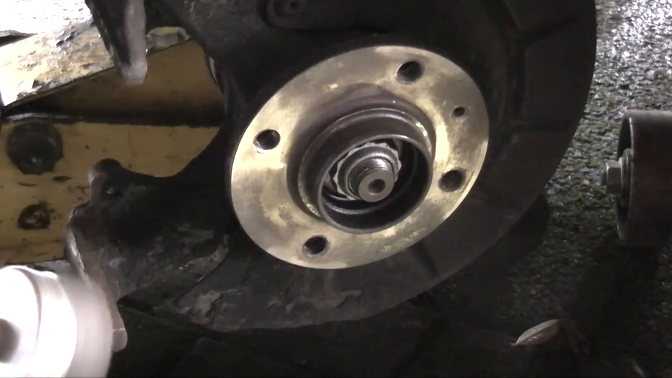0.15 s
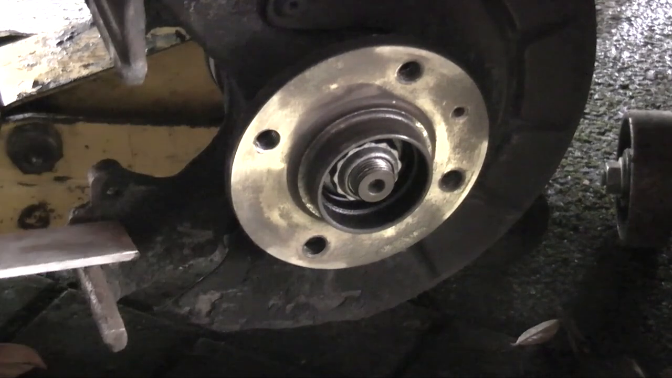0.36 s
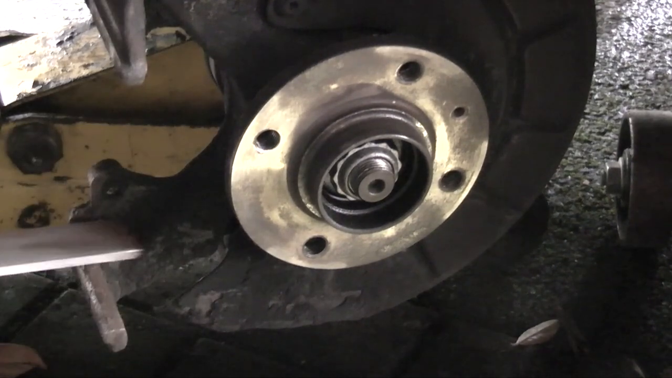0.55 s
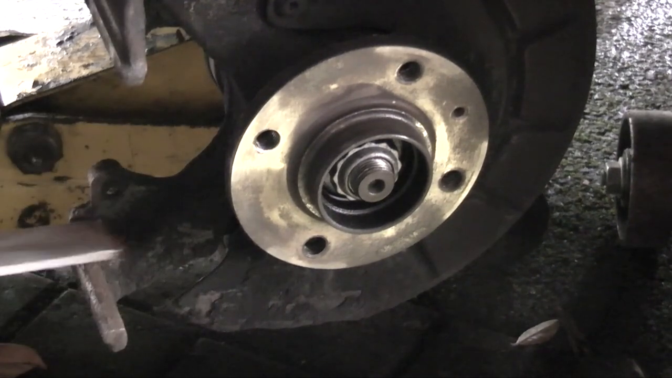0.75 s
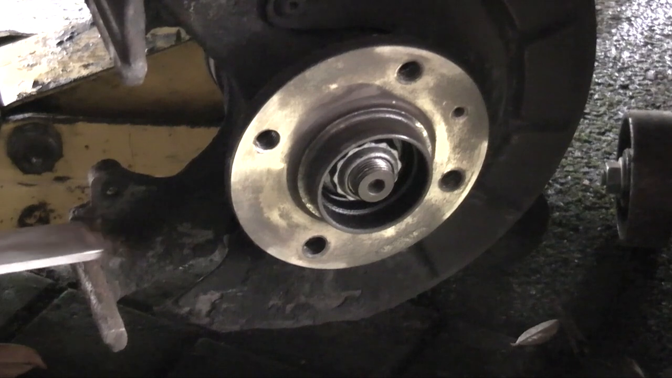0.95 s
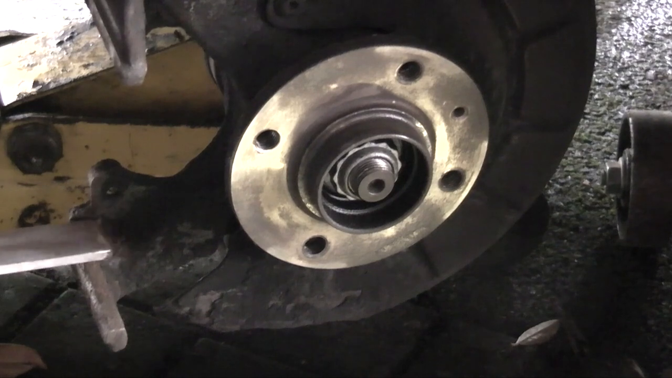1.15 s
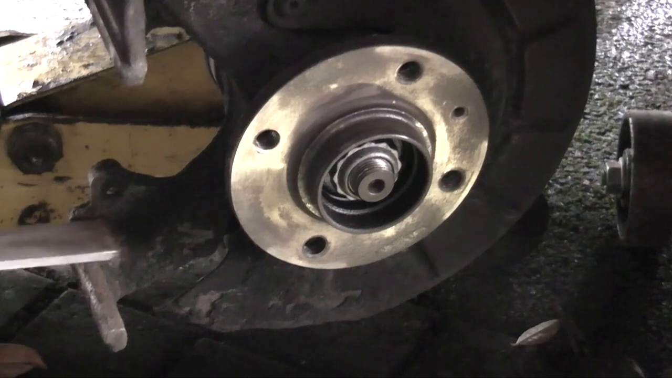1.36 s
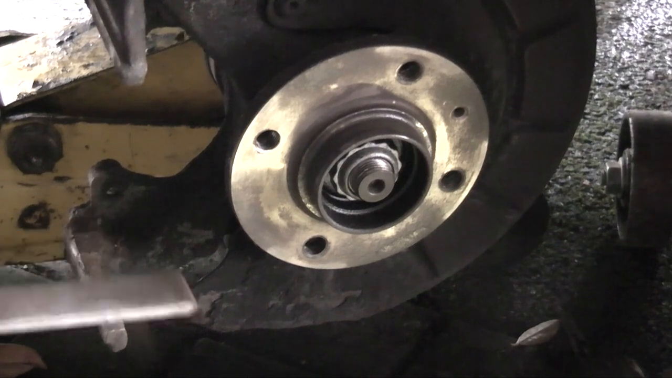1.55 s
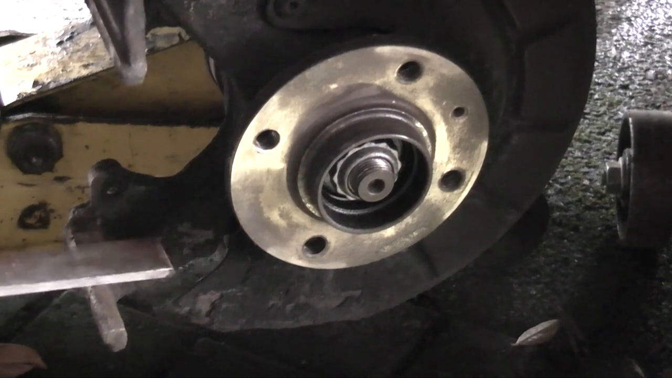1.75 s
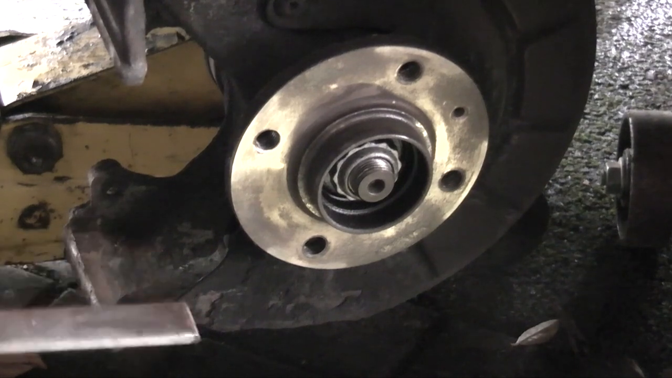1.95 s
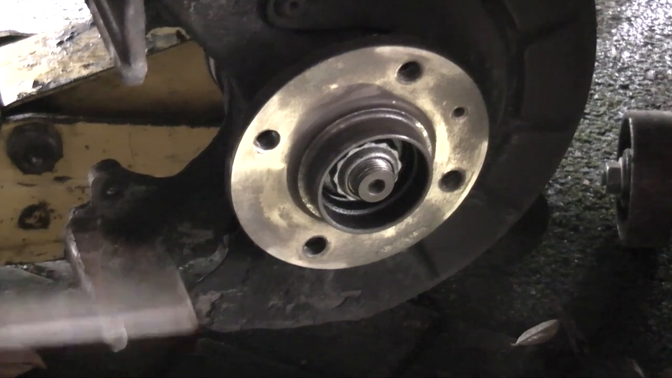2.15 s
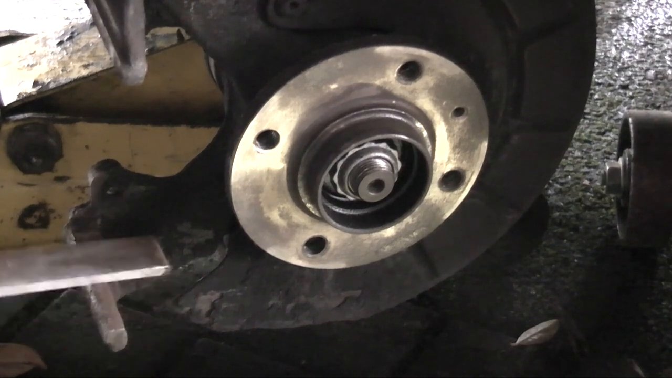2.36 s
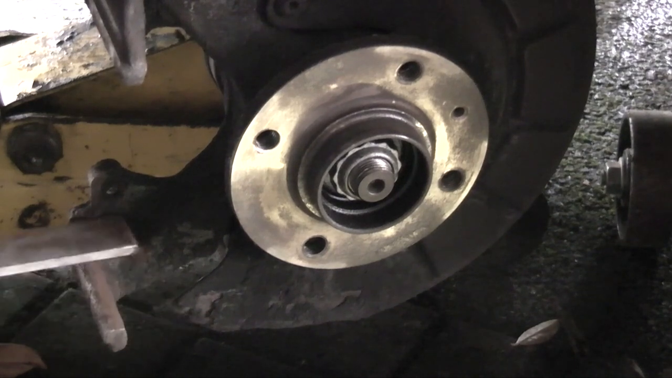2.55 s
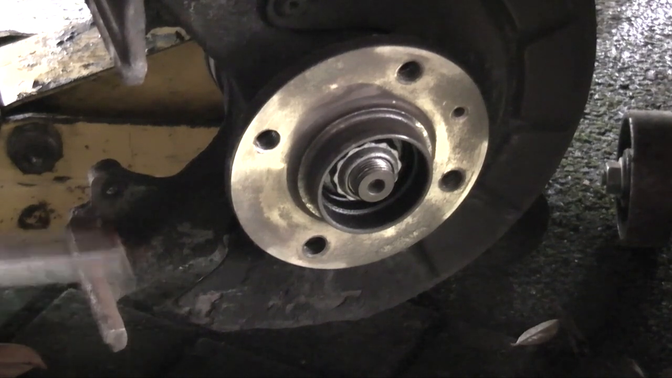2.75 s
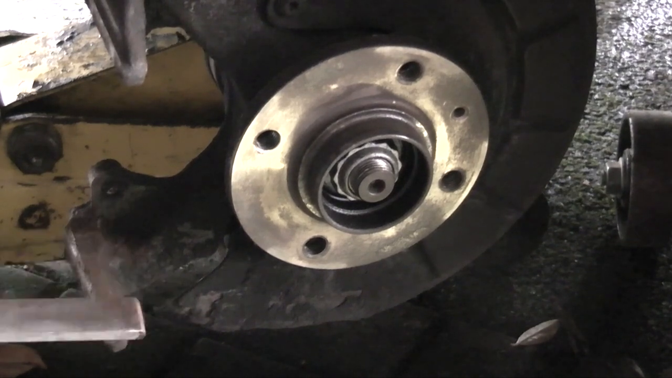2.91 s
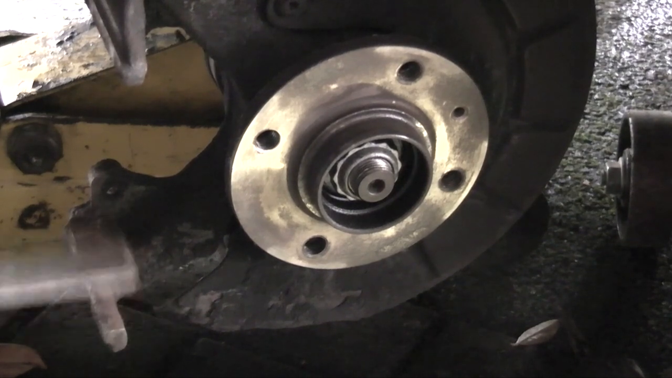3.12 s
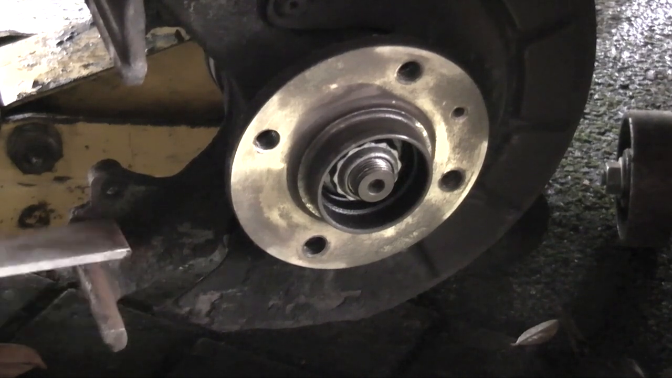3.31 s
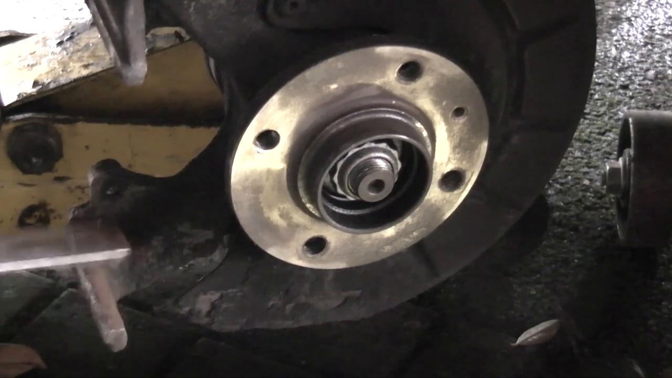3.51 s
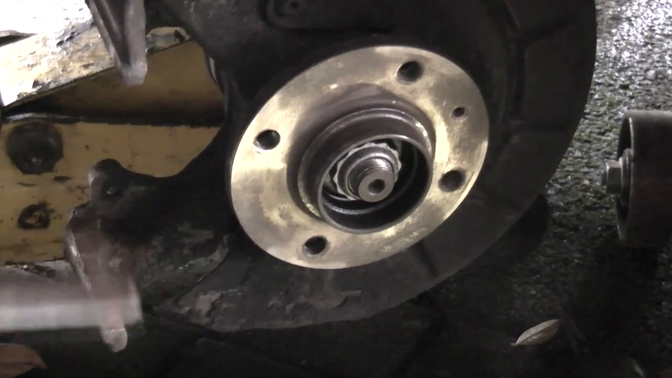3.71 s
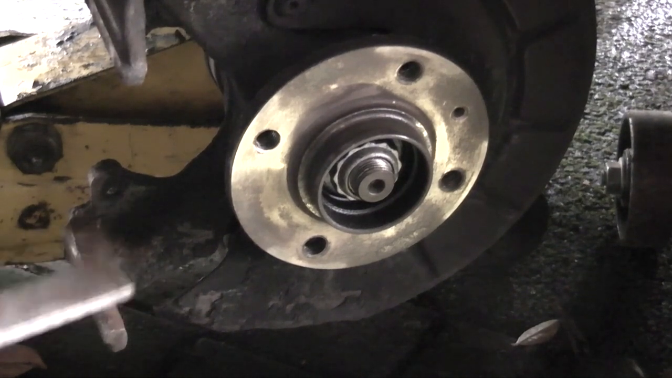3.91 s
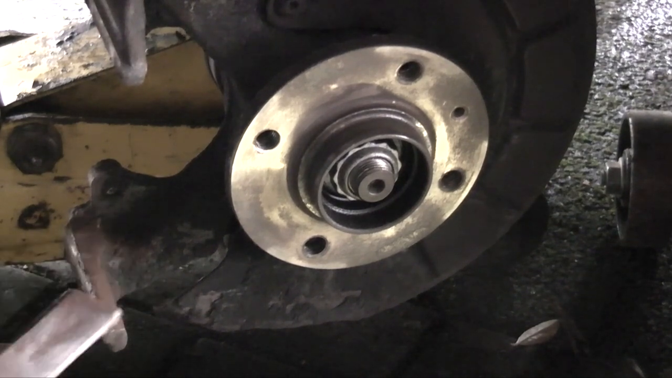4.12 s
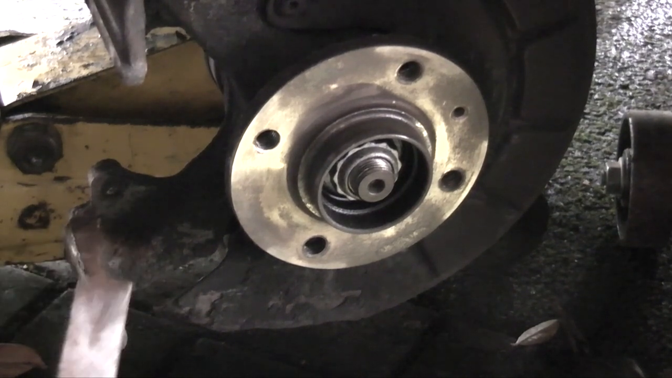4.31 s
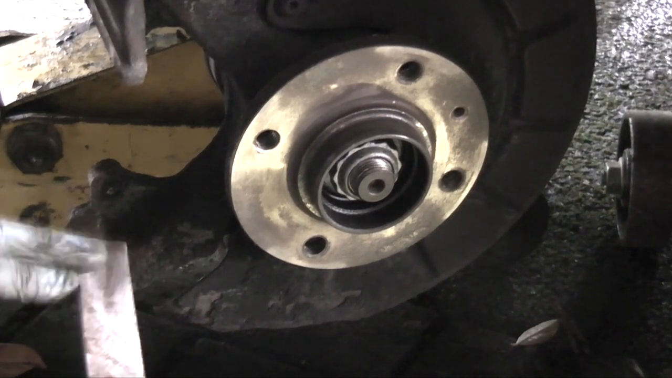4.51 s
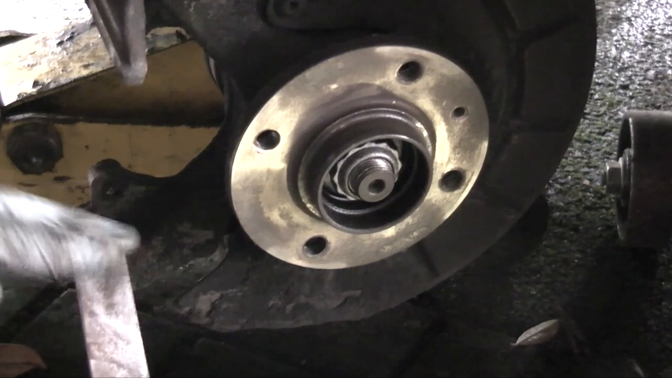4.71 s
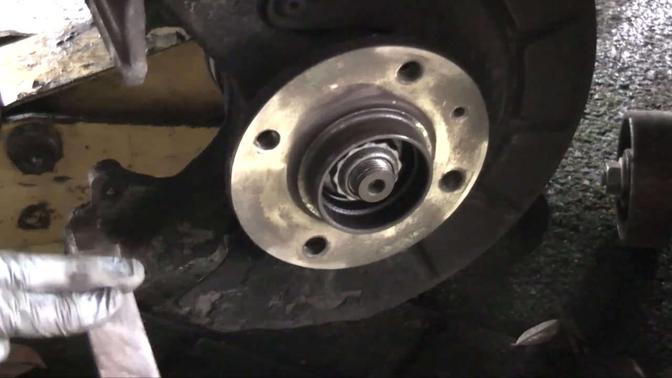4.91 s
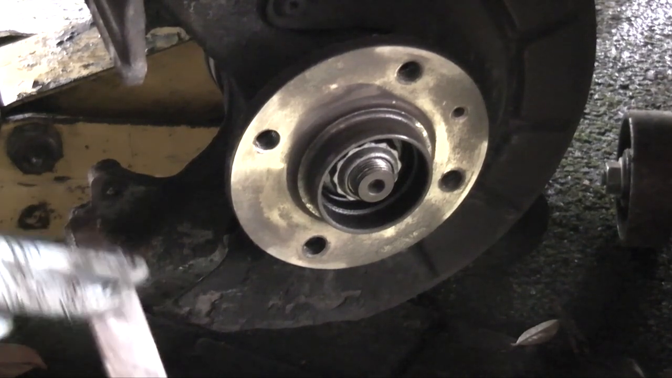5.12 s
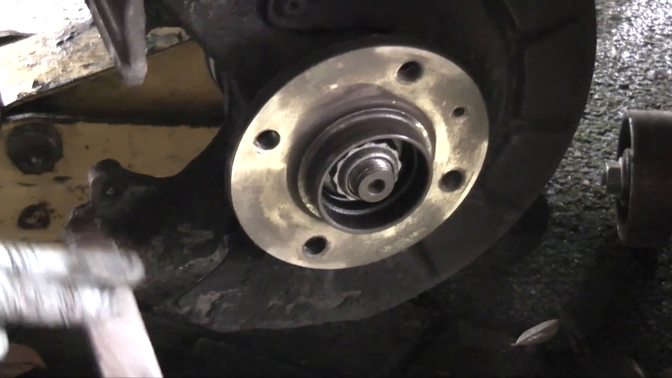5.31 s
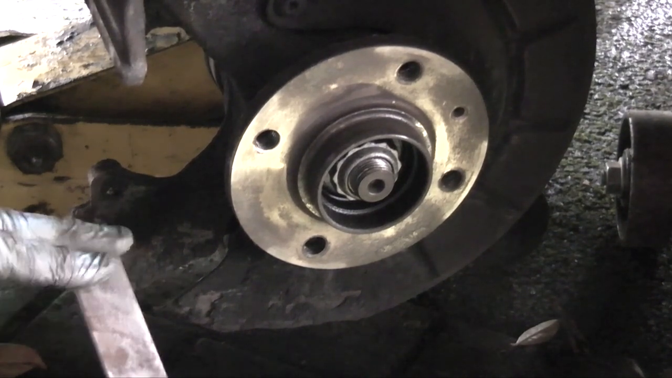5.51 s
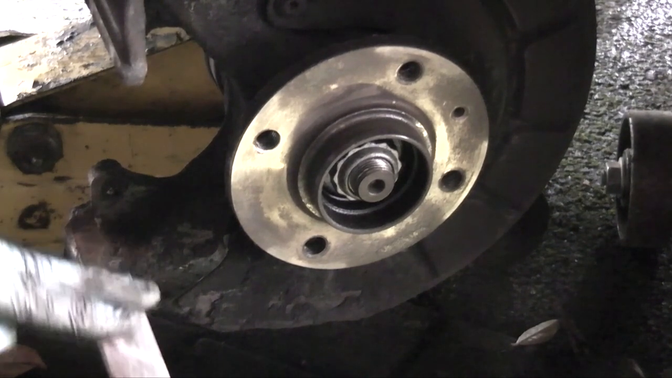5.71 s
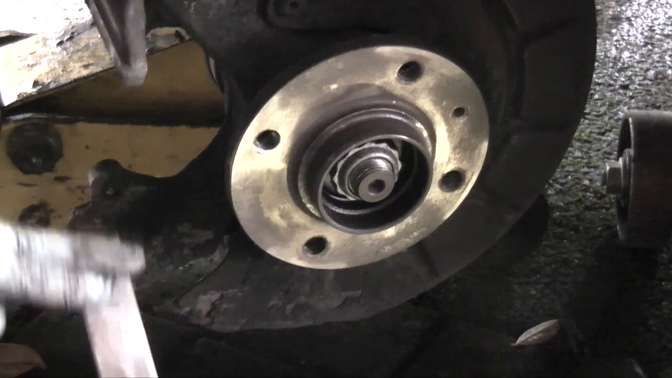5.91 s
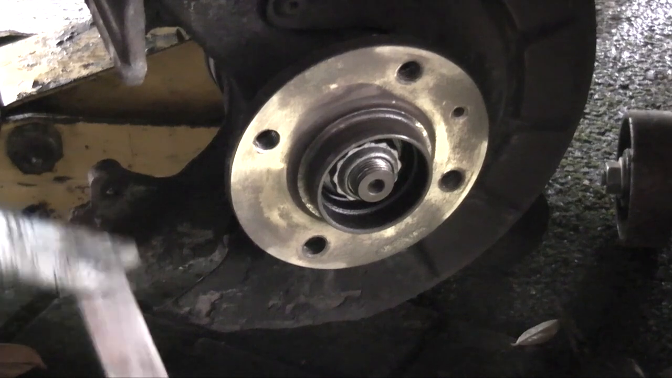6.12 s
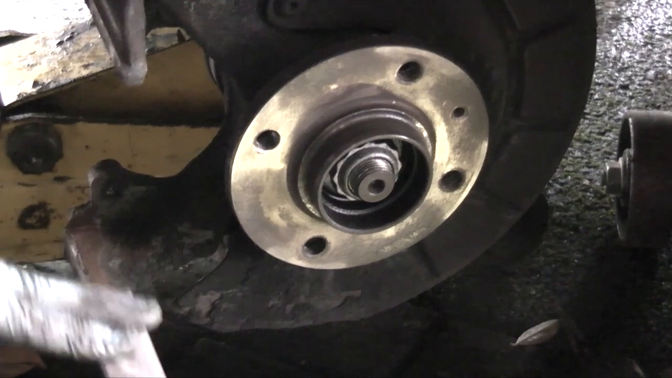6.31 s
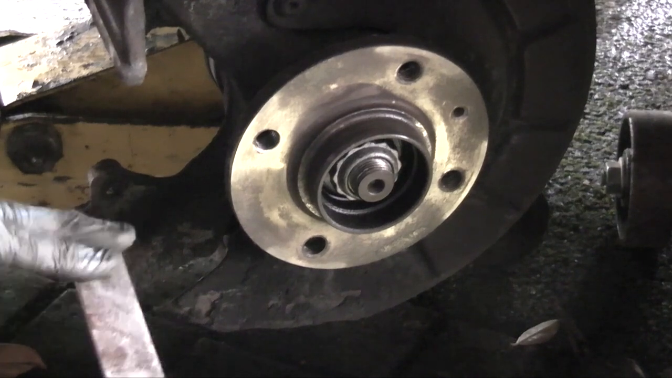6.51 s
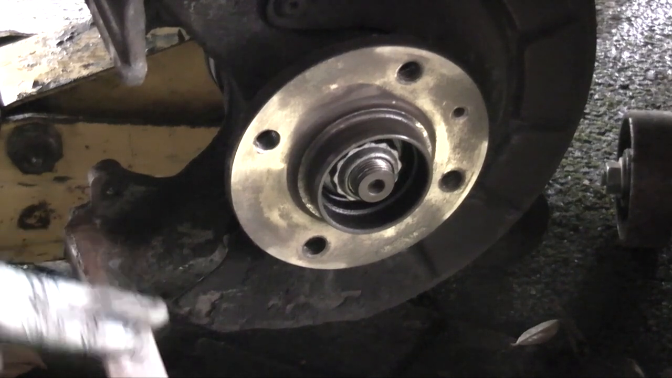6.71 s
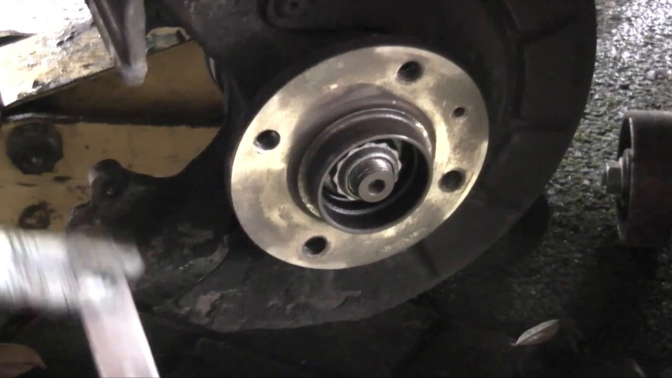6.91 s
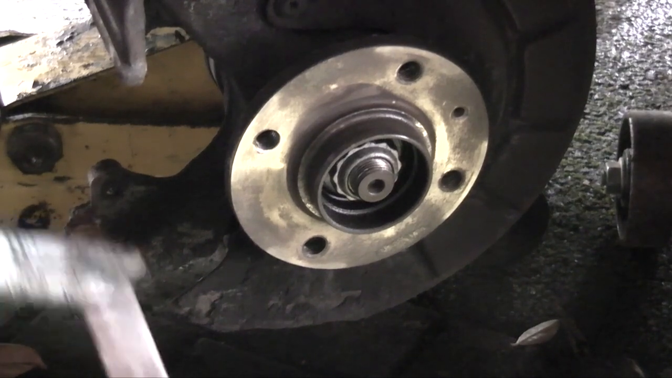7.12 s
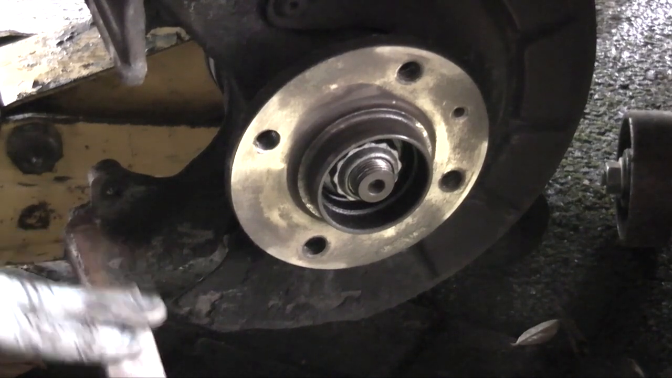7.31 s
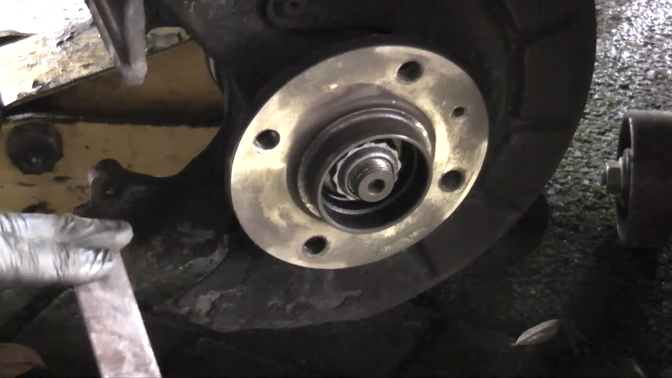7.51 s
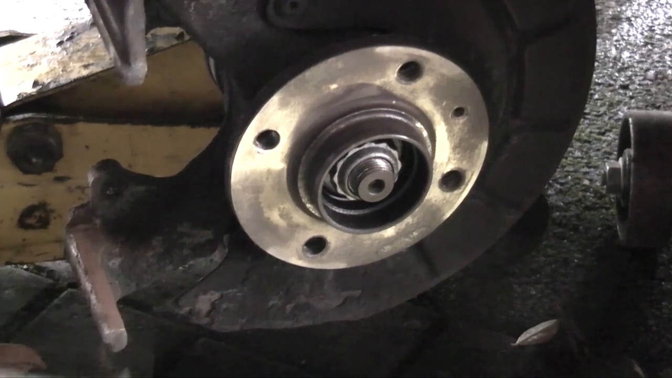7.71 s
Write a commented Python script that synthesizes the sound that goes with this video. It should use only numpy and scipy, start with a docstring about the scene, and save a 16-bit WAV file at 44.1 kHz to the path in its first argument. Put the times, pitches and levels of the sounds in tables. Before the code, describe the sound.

A brief spray-can hiss cuts off, then a hand file scrapes steel in quick back-and-forth strokes, with metallic knocks and a short slow drag midway.

```python
"""Filing rust off steel.

After a short hiss like a spray can there is a cut, and a filing scene fades in: a hand file scrapes a steel
brake carrier in quick strokes, close by in a garage. Grain noise, shaped by the speed of each stroke, drives
modes of the steel, file and hub. The file is held three ways and dragged slowly around the last change;
snags crack, and many pushes end in a bump: a pulse and a noisy rattle through a resonant shield.
Echoes and faint room noise surround it."""
import sys
import numpy as np
from scipy import signal
from scipy.fft import rfft, irfft
from scipy.io import wavfile
from scipy.ndimage import uniform_filter1d

SR = 44100
rng = np.random.default_rng(int(sys.argv[2]) if len(sys.argv) > 2 else 0)


def store_pcm(level_fs):
    """Save levels as 16-bit WAV."""
    pcm = np.round(np.clip(level_fs, -1, 1) * 32767).astype(np.int16)
    wavfile.write(sys.argv[1], SR, np.atleast_2d(pcm).T)


N = 342216
TIME = np.arange(N) / SR
HZ = np.fft.rfftfreq(16384, 1 / SR)
# a cut: the hiss ends and the filing scene fades in
CUT_S = 0.272

# Strokes, push and pull in turn. Each row: start in seconds, length in seconds, relative level in dB,
# share of the stroke at which it is fastest [0-1].
STROKES = [(0.326, 0.13, -15.5, 0.5), (0.425, 0.14, -17, 0.65), (0.57, 0.12, -13, 0.34),
           (0.66, 0.14, -16, 0.55), (0.797, 0.13, -13, 0.41), (0.89, 0.13, -14.5, 0.58),
           (0.999, 0.13, -16, 0.54), (1.1, 0.129, -24.5, 0.61), (1.243, 0.14, -17, 0.39),
           (1.348, 0.12, -18.5, 0.48), (1.456, 0.19, -12.0, 0.53), (1.6, 0.13, -15, 0.38),
           (1.748, 0.16, -11.5, 0.31), (1.912, 0.13, -11, 0.29), (2.039, 0.13, -11, 0.3),
           (2.172, 0.15, -10.5, 0.38), (2.298, 0.154, -11.5, 0.24), (2.437, 0.13, -12.0, 0.41),
           (2.546, 0.12, -10, 0.35), (2.645, 0.15, -12.5, 0.5), (2.783, 0.18, -10.5, 0.27),
           (2.909, 0.12, -9, 0.28), (3.025, 0.21, -11, 0.24), (3.162, 0.12, -13, 0.31),
           (3.279, 0.13, -9.5, 0.27), (3.402, 0.11, -8.5, 0.19), (3.503, 0.15, -10.5, 0.46),
           (3.648, 0.12, -8.5, 0.33), (3.772, 0.15, -12, 0.23), (4.914, 0.19, -26.5, 0.6),
           (5.095, 0.21, -15.5, 0.66), (5.319, 0.15, -14.0, 0.49), (5.467, 0.15, -15, 0.52),
           (5.648, 0.16, -14.0, 0.28), (5.783, 0.17, -12, 0.47), (5.953, 0.17, -12.0, 0.34),
           (6.08, 0.2, -12, 0.53), (6.301, 0.15, -11.0, 0.3), (6.422, 0.21, -12.0, 0.5),
           (6.638, 0.16, -11, 0.3), (6.753, 0.23, -11.5, 0.48), (6.951, 0.24, -12.0, 0.27),
           (7.084, 0.18, -11.0, 0.58), (7.245, 0.2, -13.0, 0.53), (7.41, 0.21, -12.5, 0.53),
           (7.619, 0.2, -12, 0.36)]
# Times in seconds at which the grip changes: on the edge, then flat, then steep with two hands.
GRIP_CHANGES_S = [1.47, 4.14]
# The file bumps at the end of a push. Each row: time in seconds, relative blow and rattle levels in dB.
BUMPS = [(.366, -61, -30), (1.068, -39, -31), (1.792, -35, -12), (2.092, -17, -13), (2.349, -70, -13),
         (2.615, -10.5, -12.5), (2.854, -11, -16.5), (3.09, -50, -16.5), (3.35, -12, -17),
         (3.592, -15, -21), (3.835, -21, -22), (5.254, -0.5, -20.5), (5.891, -3, -16), (6.221, -0.5, -15),
         (6.552, -11, -13), (6.891, -13, -11.5), (7.223, -17, -8.5), (7.558, 0, -10.5)]
# A tooth catches or the file touches down. Each row: time in seconds, relative level in dB.
SNAGS = [(1.256, -12.5), (1.815, -3.5), (2.463, -6), (3.413, -24), (4.148, -22), (4.589, -21.5),
         (4.704, -34), (4.758, -34.5), (4.962, -18), (5.659, -16), (6.126, -9.5), (6.551, -9), (6.888, -5),
         (7.221, -4.5)]


def amp(db):
    """Decibels to gain."""
    return 10 ** (np.asarray(db) / 20)


def evened(x):
    """Scales to rms 1."""
    return x / np.sqrt(np.mean(x ** 2) + 1e-20)


def read(points, hz):
    """Joins (Hz, value) points on a log-frequency axis."""
    f, value = np.transpose(points)
    return np.interp(np.log(hz + 1), np.log(f + 1), value)


def add(mix, start_s, sound):
    """Adds a sound to the mix at a time in seconds."""
    part = mix[max(round(start_s * SR), 0):][:len(sound)]
    part += sound[:len(part)]


def tilted(x, db_per_octave, pivot_hz=2900):
    """Brightens or dulls a sound about a pivot, between 700 and 9000 Hz."""
    hz = np.clip(np.fft.rfftfreq(len(x), 1 / SR), 700, 9000)
    return irfft(rfft(x) * amp(db_per_octave * np.log2(hz / pivot_hz)), len(x))


def split(x, hz):
    """The dull and the bright part of a sound."""
    dull = signal.sosfiltfilt(signal.butter(1, hz, fs=SR, output="sos"), x)
    return dull, x - dull


def body(colour, modes):
    """Causal impulse response of energy 1: resonances (Hz, width Hz, dB) standing on a broad colour."""
    peaks = sum(amp(db) ** 2 / (1 + (2 * (HZ - hz) / width_hz) ** 2) for hz, width_hz, db in modes)
    log_gain = np.log(amp(read(colour, HZ)) * np.sqrt(1 + peaks))
    circle = np.concatenate([log_gain, log_gain[-2:0:-1]])
    # minimum phase, from the Hilbert transform of the log gain
    spectrum = np.exp(np.conj(signal.hilbert(circle)))
    ring = np.fft.ifft(spectrum).real[:len(HZ)]
    return ring / np.linalg.norm(ring)


def hiss(colour):
    """Steady noise of a given colour, rms 1."""
    gain = amp(read(colour, np.fft.rfftfreq(N, 1 / SR)))
    return evened(irfft(rfft(rng.standard_normal(N)) * gain, N))


def room_noise(level_db=-44):
    """Steady coloured noise of the quiet garage."""
    # Each row: frequency in Hz, relative density in dB per Hz.
    colour = [(30, -58), (65, -17), (130, -5), (250, 3.5), (550, 3), (1100, 2.5), (2400, -4), (3800, -13),
              (7000, -18), (15000, -35)]
    return amp(level_db) * hiss(colour)


def spray(start_db=-25, sag_db_per_s=14, cut_s=0.0017):
    """A burst of coloured noise that sags and stops dead."""
    # Each row: frequency in Hz, relative density in dB per Hz.
    colour = [(59, -78), (100, -41), (248, -16.5), (281, -16.5), (487, -22), (564, -8), (640, -16.5),
              (825, -11), (1020, -15.5), (1430, -5), (1590, -12.5), (1960, -4.5), (3850, -10), (5280, -6),
              (15500, -32)]
    gate = np.clip((CUT_S - TIME) / cut_s, 0, 1)
    return amp(start_db - sag_db_per_s * TIME) * gate * hiss(colour)


def garage(x, near_db=-10, near_s=0.0094, tail_db=-11, echoes_per_s=4000):
    """Close reflections from the wheel arch, and a tail whose decay depends on frequency."""
    # Ring of hub and garage. Each row: frequency in Hz, time in seconds to fall 60 dB.
    ring_t60 = [(200, 0.75), (700, 0.33), (2000, 0.1), (5000, 0.17), (12000, 0.12)]
    t = TIME[:SR // 2]
    taps = rng.choice([-1., 1.], len(t)) * (rng.random(len(t)) < echoes_per_s / SR) * (t > .001)
    hz, frame_s, z = signal.stft(taps, SR, nperseg=256)
    fade = amp(-60 * frame_s / read(ring_t60, hz)[:, None])
    tail = signal.istft(z * fade, SR, nperseg=256)[1][:len(t)]
    near = taps * np.exp(-t / near_s)
    echoes = amp(near_db) * near / np.linalg.norm(near) + amp(tail_db) * tail / np.linalg.norm(tail)
    return x + signal.fftconvolve(x, echoes)[:N]


def microphones(mid, balance_db=0.18):
    """Two close capsules: their small difference arrives late, by an amount that changes with frequency."""
    # Each row: frequency in Hz, level of the difference in dB against the sum.
    width = [(60, -15), (300, -26), (700, -17.5), (2800, -15), (5000, -23.5), (12000, -47)]
    hz, knots_hz = np.fft.rfftfreq(N, 1 / SR), np.arange(0, SR / 2, 25)
    phase = np.interp(hz, knots_hz, -np.cumsum(rng.exponential(1, len(knots_hz))))
    side = irfft(rfft(mid) * amp(read(width, hz)) * np.exp(1j * phase), N)
    return np.array([(mid + side) * amp(-balance_db), (mid - side) * amp(balance_db)])


def hub(force):
    """A few lightly damped modes of the heavy hub sing on between the strokes."""
    # Each row: frequency in Hz, time in seconds to fall about 49 dB, relative drive in dB on edge, flat, steep.
    hub_modes = [(655, 0.77, 11.5, 15.5, 9.4), (1130, 0.44, 8, 20.3, 15.6), (1564, 0.23, -3, 9, 1.7),
                 (1651, 1, 8, 23.2, 18.2), (3930, 0.44, 13, 12, 10.7)]
    grip = np.searchsorted(GRIP_CHANGES_S, TIME)
    out = np.zeros(N)
    for hz, decay_s, *drive_db in hub_modes:
        b, a = signal.iirpeak(hz, hz * decay_s / 1.78, fs=SR)
        out += signal.lfilter(b, a, force * amp(drive_db)[grip])
    return out


def shield(knocks):
    """A bump shakes what is likely the sheet-steel shield: resonances on a broad thud."""
    # Each row: frequency in Hz, relative density in dB per Hz.
    thud = [(60, -53), (130, -12.5), (230, -16.5), (350, -2.5), (700, -10.5), (1400, -2), (2800, 5.5),
            (5000, -8), (10000, -51)]
    # Each row: frequency in Hz, width in Hz, level in dB above the thud colour.
    shield_modes = [(321, 35, 13.5), (343, 5.3, 11), (406, 7, 22.5), (430.5, 6.8, 19.5), (492, 52, 15),
                    (611.4, 4.7, 22.5), (655, 44, 18), (840, 196, 19.5), (1191, 17, 19.5), (1360, 14, 12),
                    (2330, 110, -17), (2700, 170, -8)]
    return signal.oaconvolve(knocks, body(thud, shield_modes))[:N]


def blade(force):
    """A file mode sounds while the contact is off its nodes, so colours come and go within a stroke."""
    # Bending modes. Each row: frequency in Hz, width in Hz, relative gain in dB, half waves along the stroke.
    file_modes = [(2463, 91, 10.5, 1.17), (3044, 27, 16, 1.43), (3490, 89, 12, 2.26), (3820, 45, 9.5, 0.97),
                  (4620, 41, 9, 3.1), (5170, 130, 7, 3.44), (7230, 58, 7, 3.24), (12300, 59, -19, 2.2)]
    starts_s = [row[0] for row in STROKES]
    ends = np.arange(len(STROKES)) % 2 + rng.normal(0, 0.26, len(STROKES))
    travel = np.interp(TIME, starts_s, ends)
    out = np.zeros(N)
    for hz, width_hz, db, half_waves in file_modes:
        b, a = signal.iirpeak(hz, hz / width_hz, fs=SR)
        out += amp(db) * signal.lfilter(b, a, force * np.cos(np.pi * half_waves * travel))
    return out


def steel(force):
    """Each grip damps and drives the modes of the steel differently."""
    # Broad contact colour. Each row: frequency in Hz, relative level in dB on edge, flat, steep.
    contact = np.array([(60.3, -67, -82, -86), (134, -41.5, -47, -31), (292, -30.5, -24.5, -26.5),
                        (476, -31.5, -25.5, -25), (1040, -32.5, -21.5, -28.5), (1484, -28.5, -18, -27.5),
                        (1730, -34, -11, -19.5), (3690, -17, -14.5, -12.5), (5040, -27, -12.5, -18.5),
                        (5860, -27, -23.5, -22), (6980, -34, -30.5, -19), (8820, -35, -28, -34.5),
                        (10060, -41.5, -35.5, -36.5), (14400, -57, -51.5, -51.5)])
    # Carrier and file modes. Each row: frequency in Hz, width in Hz, dB above the colour on edge, flat, steep.
    modes = np.array([(333.7, 13, 17, 14, 7.5), (695, 4.4, 2, 6, 10), (848, 82, 9.5, 15, 10.5),
                      (911, 29, 13, 17, 22), (1050, 4.8, 8, 21, 33), (1034, 8.2, 18, 25, -7.5),
                      (1146.8, 7.3, 6, 20, 30), (1220, 198, 12, 15, 13.5), (1515, 50, 15, 15, -2),
                      (1570, 30, 19, 16, 13.5), (1672, 8.4, 27.5, 2, 17.5), (1757, 77, 20, 5, 11.5),
                      (1814, 18, 26.5, 9, 13), (1947, 83, 21, 10, 14.5), (2218, 49, 15, 6.5, 10),
                      (2443, 41, -9, 8, -7), (2677, 26, 13, 11, 5), (2763, 42, 15.5, 7, 10.5),
                      (3067, 40, 13, 7.5, -21), (3570, 59, -1, -4, -25), (3510, 148, 4.5, 14, -30),
                      (3752, 56, 5, 13, 5.5), (3850, 38, 1, -41, 8.5), (4317, 81, 7, -29, 8.5),
                      (5350, 300, 6, -22, 9), (6670, 420, 2, 11, -18), (7117, 52, 14.5, 23.5, 7.5),
                      (8615, 385, 3.5, 5, 10.5), (11640, 116, 2, 7, -16), (12940, 160, 4, 15, 8)])
    grip = np.searchsorted(GRIP_CHANGES_S, TIME)
    out = np.zeros(N)
    for k in range(len(GRIP_CHANGES_S) + 1):
        ring = body(contact[:, [0, k + 1]], modes[:, [0, 1, k + 2]])
        out += signal.oaconvolve(force * (grip == k), ring)[:N]
    return out


def grit(snaps_per_s, spread_db, smooth, judder_db):
    """Teeth snap off rust grains of many sizes over a fine rub; the bite judders every few ms."""
    sizes = amp(spread_db * np.minimum(rng.exponential(1, N), 3.5)) * rng.choice([-1, 1], N)
    snaps = evened(sizes * (rng.random(N) < snaps_per_s / SR))
    judder_band = signal.butter(2, [25, 260], "band", fs=SR, output="sos")
    judder = evened(signal.sosfilt(judder_band, rng.standard_normal(N)))
    return evened((snaps + smooth * rng.standard_normal(N)) * amp(judder_db * judder))


def bumps(blow_s=0.00402, rattle_s=0.058, rise_s=0.0011, crunch_db=-6, push_db=-9, push_s=0.00037):
    """Force of a bump: one firm push with a short crunch, then a loose rattle."""
    crunch, push, t = np.zeros(N), np.zeros(N), TIME[:SR // 3]
    for s, blow_db, rattle_db in BUMPS:
        shape = amp(blow_db) * np.exp(-t / blow_s) + amp(rattle_db) * np.exp(-t / rattle_s)
        add(crunch, s, shape * (1 - np.exp(-t / rise_s)))
        add(push, s + blow_s, amp(blow_db) * (1 - t / push_s) * np.exp(-t / push_s))
    grains = grit(snaps_per_s=2500, spread_db=2.2, smooth=0.79, judder_db=0.0)
    return amp(push_db) * push + amp(crunch_db) * crunch * grains


def snags(decay_s=0.0033):
    """Single sharp cracks of decaying bright noise as a tooth bites or the file touches down."""
    force, t = np.zeros(N), TIME[:SR // 20]
    for s, db in SNAGS:
        add(force, s, amp(db) * np.exp(-t / decay_s))
    return force * tilted(rng.standard_normal(N), db_per_octave=5.0)


def chatter(wander=0.156):
    """Teeth chatter over an edge: a sine of unsteady, rising frequency."""
    # Each row: start in seconds, length in seconds, relative level in dB, first and last frequency in Hz.
    runs = [(3.891, .23, -26.5, 1970, 2507), (7.656, 0.15, -16, 1742, 2352)]
    force = np.zeros(N)
    for s, length_s, db, first_hz, last_hz in runs:
        count = round(length_s * SR)
        unsteady = evened(uniform_filter1d(rng.standard_normal(N), size=40))[:count]
        rate_hz = np.linspace(first_hz, last_hz, count) * (1 + wander * unsteady)
        turns = np.cumsum(rate_hz) / SR
        add(force, s, amp(db) * np.sin(2 * np.pi * turns) * signal.windows.tukey(count, .5))
    return force


def drag(bright_db=-4):
    """Slow sliding catches fewer, more separate grains and sounds duller."""
    # Drag while the grip changes. Each row: time in seconds, relative level in dB.
    level = [(3.87, -24), (3.941, -18.5), (4.1, -19.5), (4.134, -29.5), (4.199, -24), (4.25, -31),
             (4.39, -24), (4.53, -18.5), (4.595, -29.5), (4.62, -54)]
    s, db = np.transpose(level)
    grains = grit(snaps_per_s=2500, spread_db=3.5, smooth=0.65, judder_db=1.5)
    dull = signal.sosfiltfilt(signal.butter(2, 3400, fs=SR, output="sos"), grains)
    gain = amp(np.interp(TIME, s, db, left=-np.inf, right=-np.inf))
    return gain * (dull + amp(bright_db) * (grains - dull))


def checks(skip_db=-9, skip_s=0.0058, stop_db=-9, stop_s=0.029):
    """Gain of the strokes: the file skips just before a snag, and a hard bump checks its speed."""
    db, t = np.zeros(N), TIME[:SR // 8]
    for s, _ in SNAGS:
        add(db, s - t[-1], skip_db * np.exp(-t[::-1] / skip_s))
    for s, blow_db, _ in BUMPS:
        add(db, s, stop_db * np.sqrt(amp(blow_db)) * t / stop_s * np.exp(1 - t / stop_s))
    return amp(db)


def recoloured(x, spread_db=2.5, patch_hz=260):
    """Each stroke meets the steel at another spot and favours other bands by chance."""
    hz, knots = np.fft.rfftfreq(len(x), 1 / SR), rng.standard_normal(size=200)
    gain_db = spread_db * np.interp(hz / patch_hz, np.arange(len(knots)), knots)
    return irfft(rfft(x) * amp(gain_db), len(x))


def strokes(dull_power=1.0, bright_power=2.94, level_db=2, rest_db=-35, tooth_hz=900, tooth_depth=0.28):
    """Force at the teeth: speed makes one arch a stroke; treble follows it more than bass."""
    # a stroke of ordinary level has this tilt; a harder one is brighter
    ordinary_db, tilt_db_per_octave, extra_tilt_per_db = -13, 1.23, 0.3881
    teeth = grit(snaps_per_s=3000, spread_db=0.23, smooth=0.63, judder_db=1.0)
    force, touching = np.zeros(N), np.zeros(N)
    for s, length_s, db, fastest in STROKES:
        along = np.linspace(0, 1, round(length_s * SR))
        # the exponent puts the top of the arch at the fastest point
        skew = np.log(.5) / np.log(np.clip(fastest, .1, .9))
        speed = abs(np.sin(np.pi * along ** skew))
        passing = 1 + tooth_depth * np.cos(2 * np.pi * np.cumsum(tooth_hz * np.sqrt(speed)) / SR)
        grains = passing * np.take(teeth, round(s * SR) + np.arange(len(along)), mode="wrap")
        tilt = tilt_db_per_octave + extra_tilt_per_db * (db - ordinary_db)
        dull, sharp = split(tilted(recoloured(grains), tilt), hz=1850)
        add(force, s, amp(db + level_db) * (dull * speed ** dull_power + sharp * speed ** bright_power))
        add(touching, s, np.ones(len(along)))
    # a faint bright rub before the first stroke and through the strokes, heard as the file turns round
    touching = np.minimum(touching + (TIME < STROKES[0][0]), 1)
    touching = uniform_filter1d(touching, size=SR // 12)
    return force * checks() + amp(rest_db) * touching * tilted(teeth, db_per_octave=5.0)


def scene():
    """The hiss ends at a cut, and the filing scene fades in."""
    knocks = bumps()
    force = strokes() + drag() + chatter() + snags() + amp(-13.5) * split(knocks, hz=4000)[0]
    scrape = amp(-6.0) * steel(force) + amp(-9.0) * blade(force)
    filing = garage(scrape + shield(knocks)) + amp(-2.5) * hub(force) + room_noise()
    fade_in = np.clip((TIME - CUT_S) / .03, 0, 1)
    return microphones(filing * fade_in + spray())


def record(dry):
    """The highest peaks clip at full scale; then the bass cut and the band limit."""
    bass_cut = signal.butter(2, 45, "high", fs=SR, output="sos")
    clipped = signal.sosfilt(bass_cut, np.clip(dry, -1, 1))
    band_limit = signal.firwin(511, 15750, window=("kaiser", 9), fs=SR)
    return signal.oaconvolve(clipped, band_limit[None], "same")


dry = scene()
out = record(dry)
store_pcm(out)
```